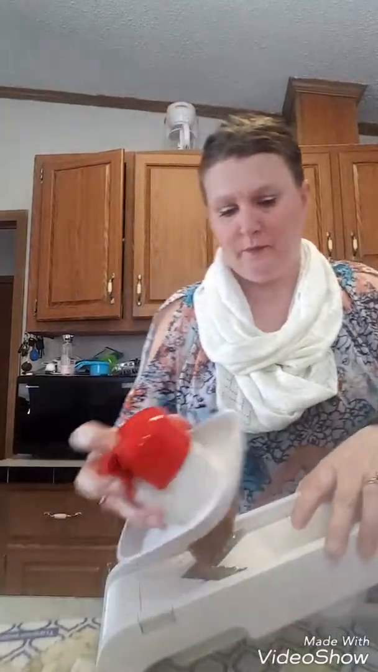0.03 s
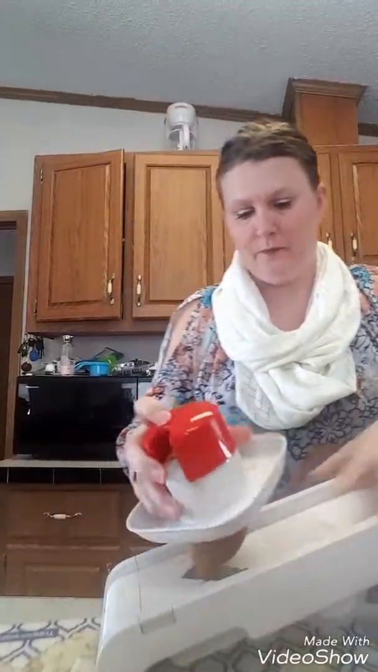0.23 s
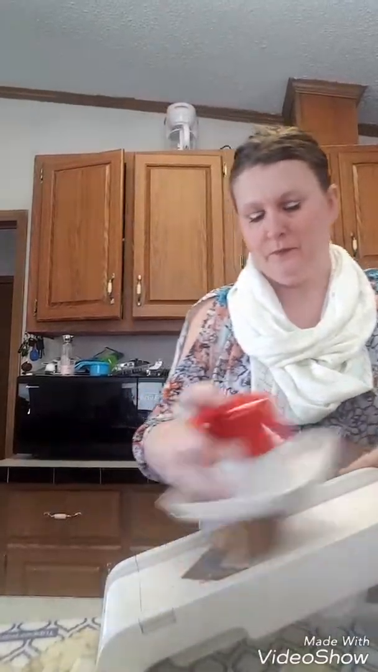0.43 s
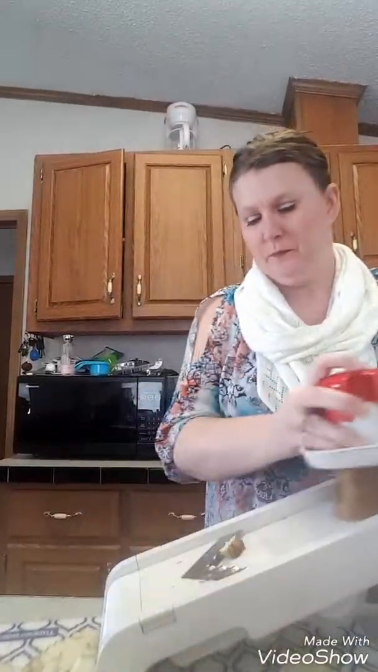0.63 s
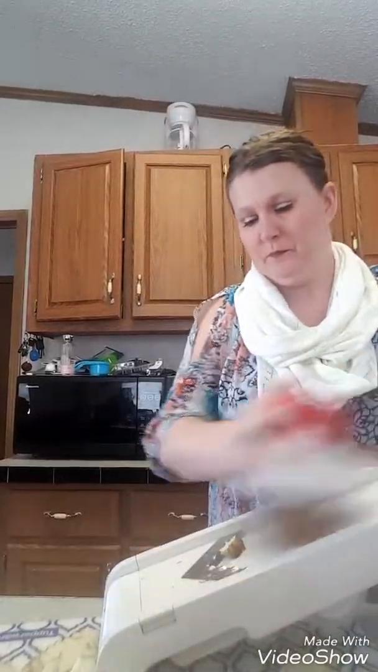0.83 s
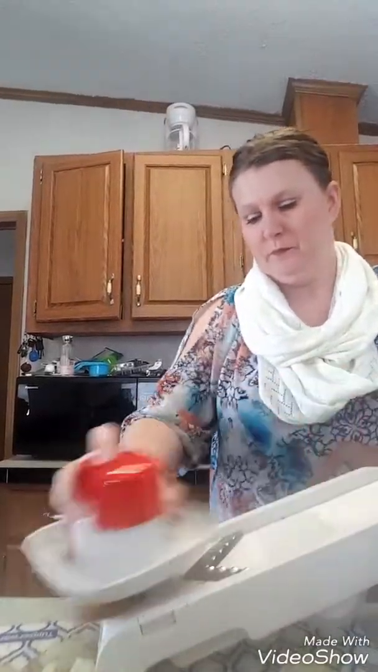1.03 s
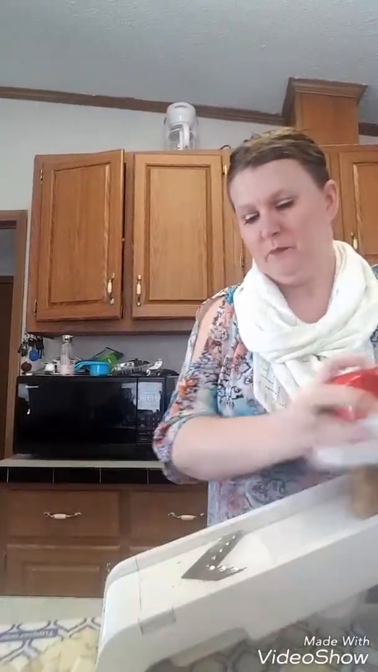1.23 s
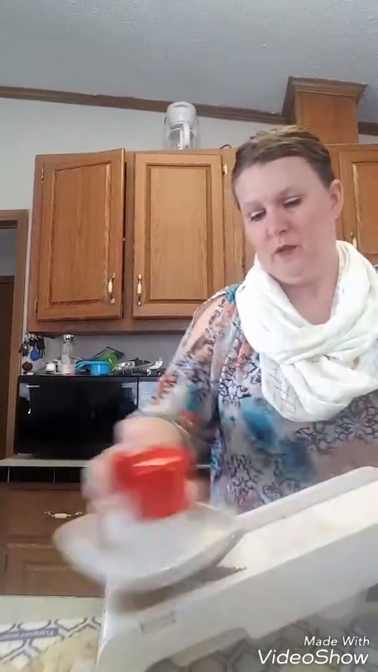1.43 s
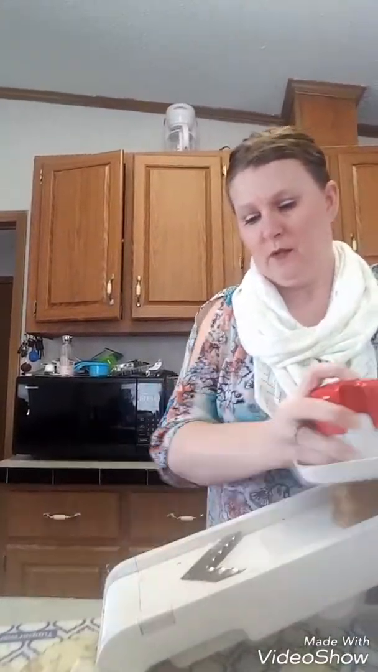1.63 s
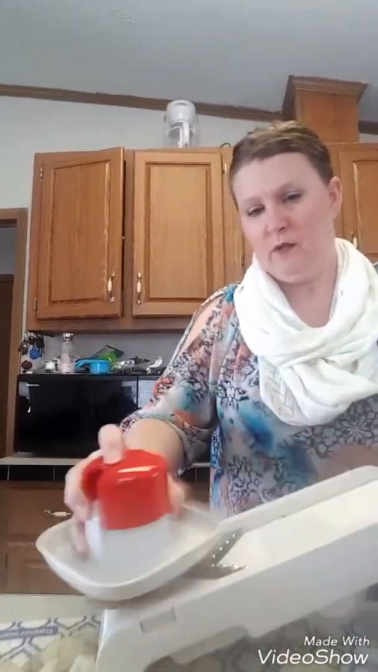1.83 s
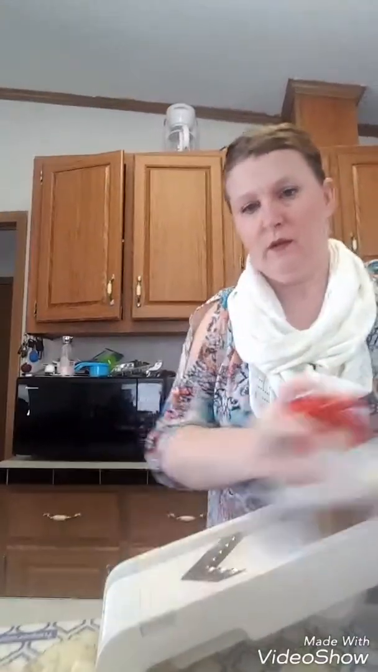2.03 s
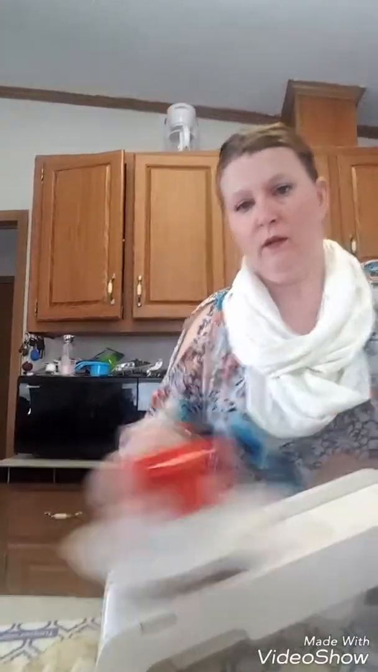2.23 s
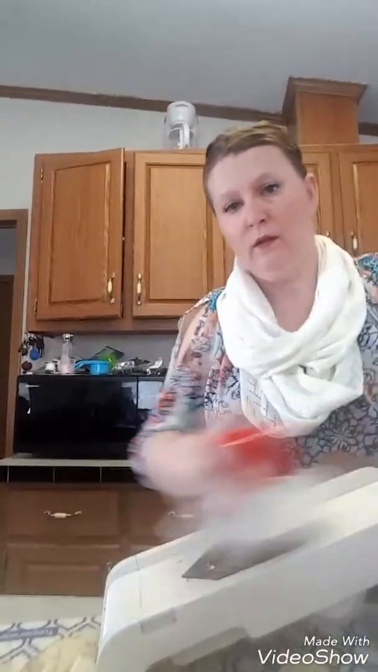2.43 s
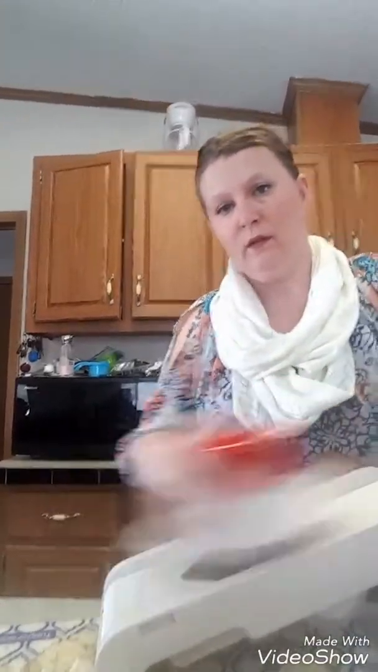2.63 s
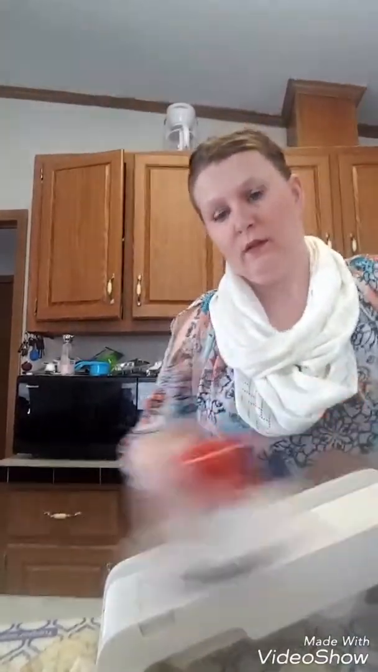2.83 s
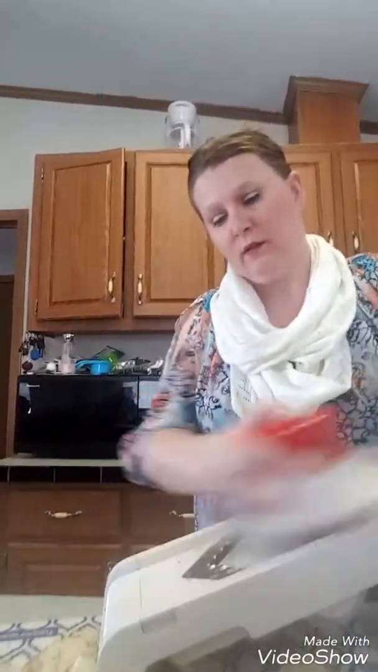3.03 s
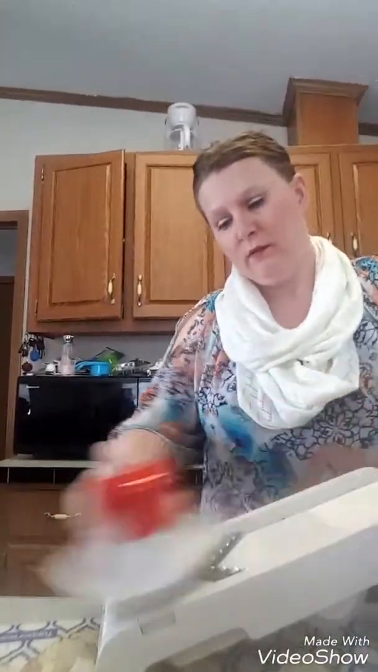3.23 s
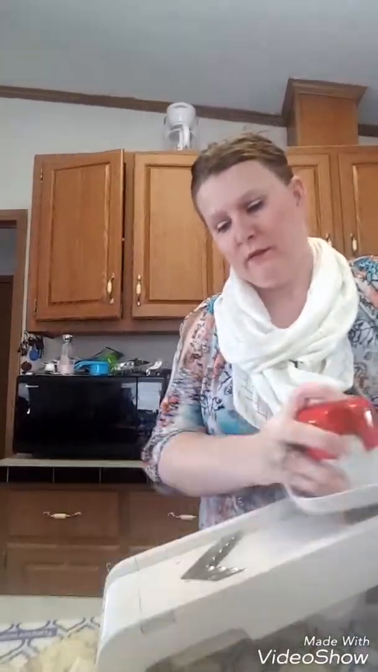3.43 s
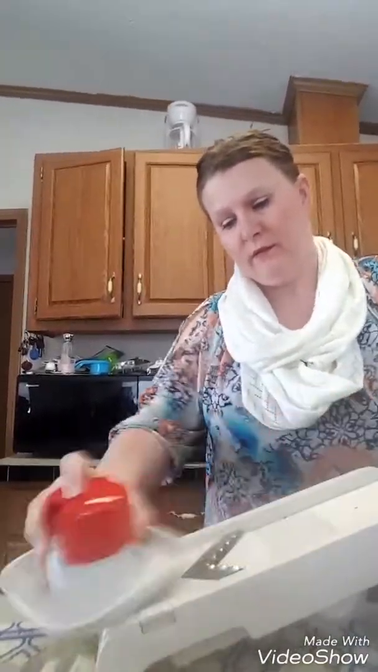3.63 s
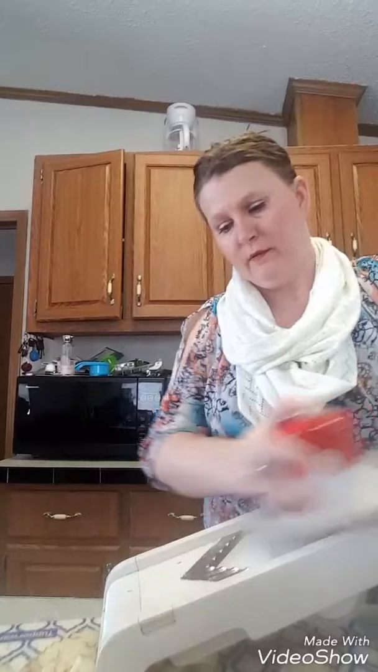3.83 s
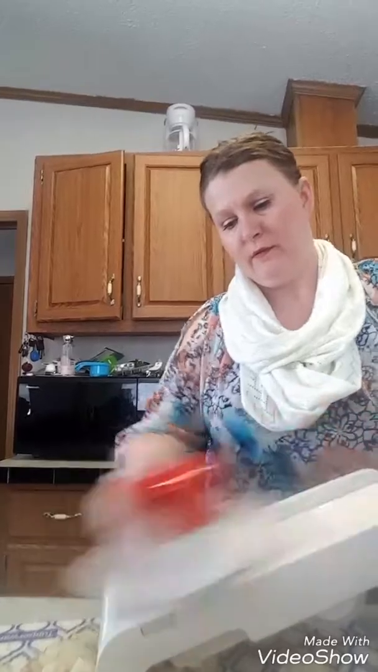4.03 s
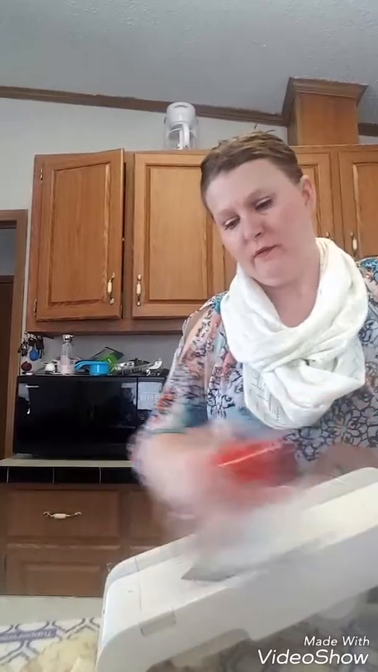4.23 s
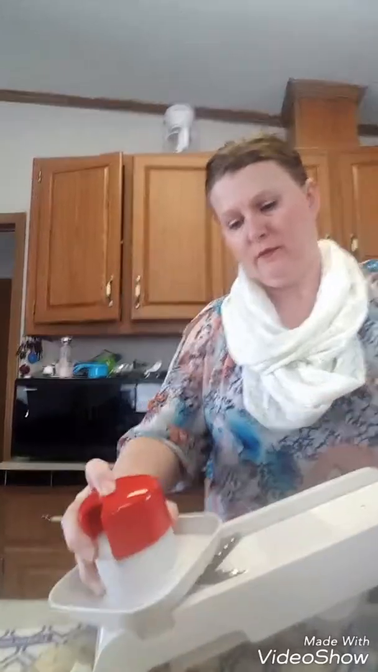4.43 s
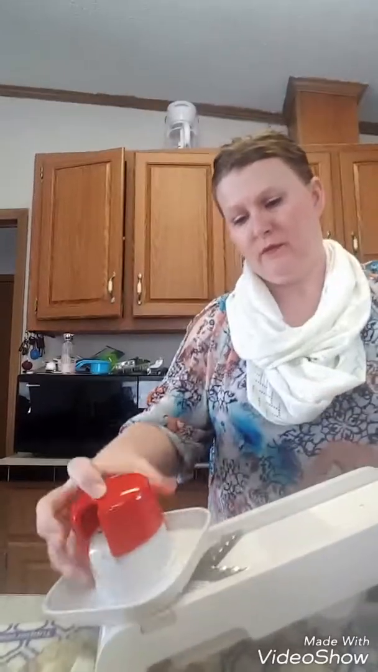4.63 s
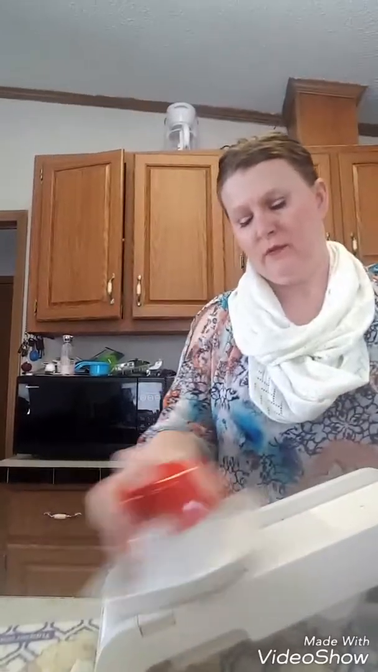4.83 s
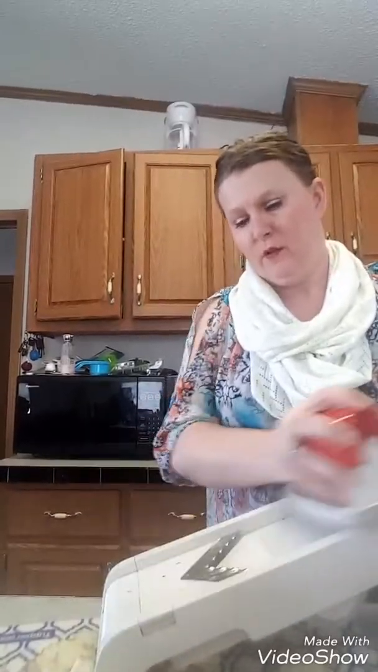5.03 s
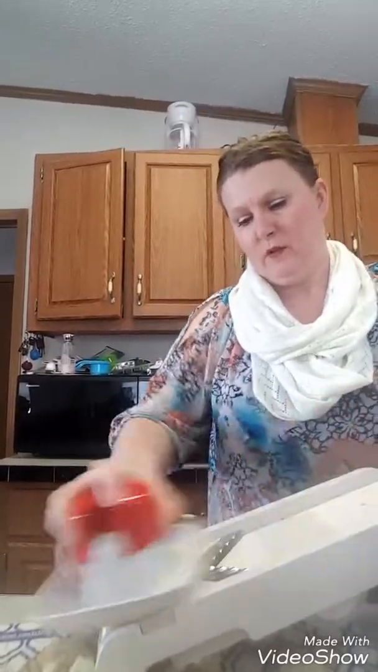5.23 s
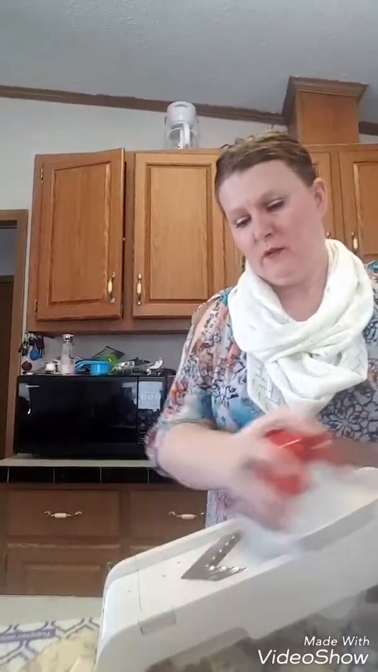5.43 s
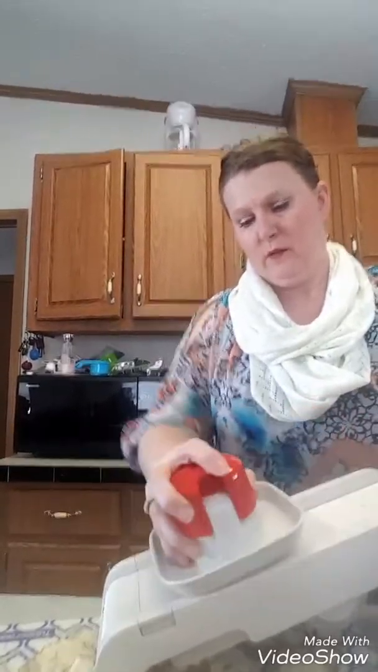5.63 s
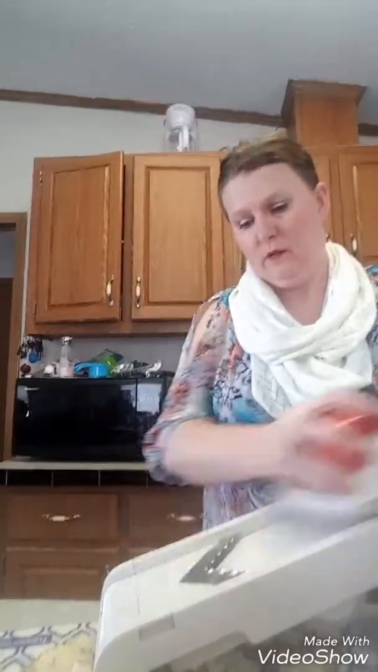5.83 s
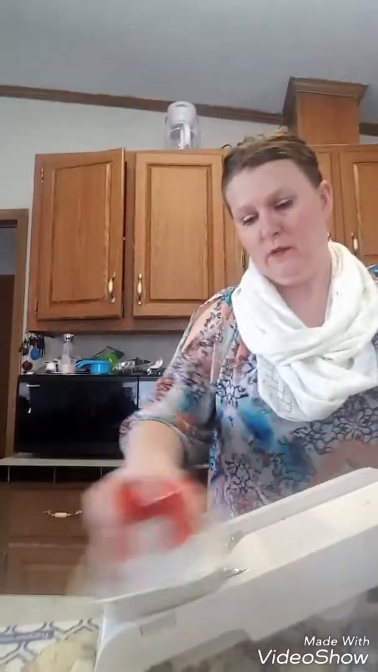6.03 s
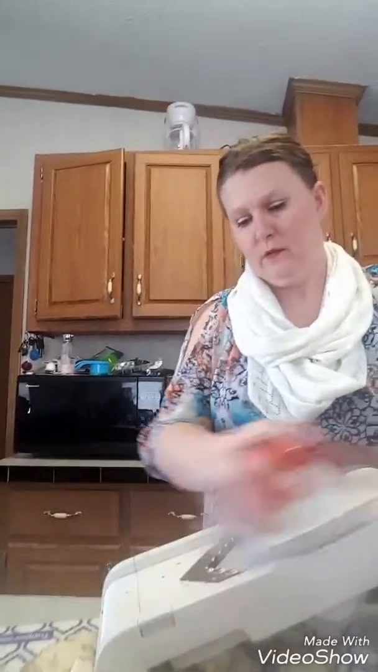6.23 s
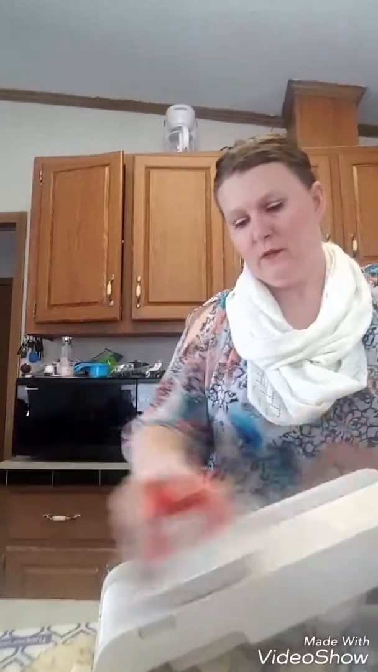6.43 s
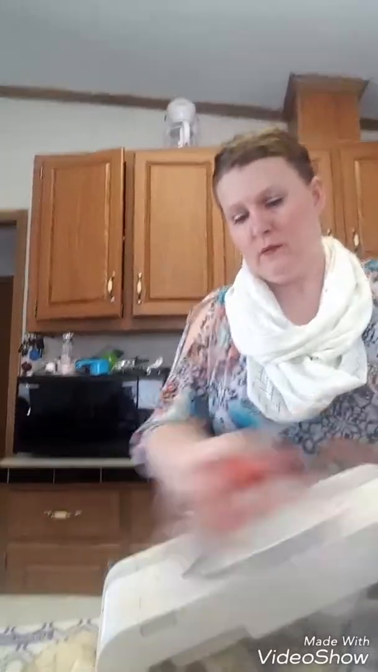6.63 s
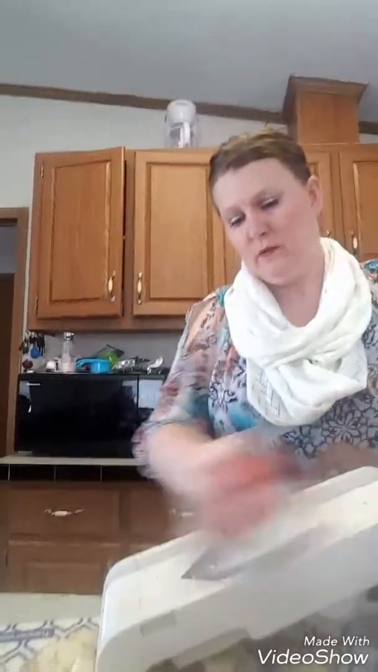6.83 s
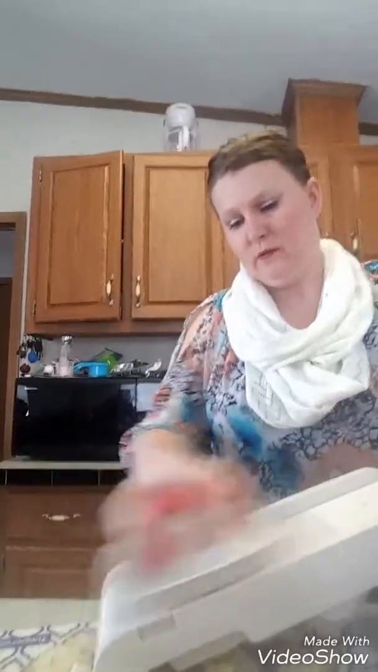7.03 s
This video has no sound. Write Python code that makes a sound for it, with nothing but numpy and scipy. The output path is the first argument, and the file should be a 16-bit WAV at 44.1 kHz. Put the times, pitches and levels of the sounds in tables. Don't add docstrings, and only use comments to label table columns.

```python
import sys
import numpy as np
from scipy import signal
from scipy.fft import rfft, irfft
from scipy.io import wavfile
from scipy.ndimage import uniform_filter1d

SR = 44100
rng = np.random.default_rng(int(sys.argv[2]) if len(sys.argv) > 2 else 0)


def inscribe(sig):
    pcm = np.round(np.clip(np.atleast_2d(sig).T, -1, 1) * 32767)
    wavfile.write(sys.argv[1], SR, pcm.astype(np.int16))


def makeup_ratio(level_db):
    decades = np.asarray(level_db, float) / 20
    return 10 ** decades


N = 313110

# start in seconds, hand pressure in dB,
# guard wobble in dB, skin speed in dB, hold in seconds.
PUSHES = [(0.0, -30.5, -31.5, -38, 0.0025), (0.525, -34, -39, -35.5, 0.0064), (0.993, -20, -31, -31, 0.017),
          (1.488, -18.5, -27, -18.5, 0.0064), (1.866, -22, -20, -47, 0.0042),
          (2.218, -31, -32, -23.5, 0.015), (2.574, -29, -32, -25, 0.011),
          (2.93, -24.5, -26.5, -28.5, 0.055), (3.308, -28.5, -21.5, -19, 0.0062),
          (3.65, -23, -22.5, -41, 0.03), (3.992, -26.5, -30, -34, 0.055), (4.333, -29, -27, -52, 0.0026),
          (4.371, -46.5, -32, -10, 0.0042), (4.87, -48, -62, -46.5, 0.0066),
          (5.215, -18.5, -27.5, -34, 0.073), (5.78, -38, -68, -35, 0.0034),
          (6.11, -20.5, -23.5, -19, 0.025), (6.335, -22.5, -14.5, -29, 0.025),
          (6.528, -22, -22, -17, 0.019), (6.764, -27, -15, -18.5, 0.0027)]
# peak time in seconds, hand pressure in dB,
# guard wobble in dB, skin speed in dB.
DRAGS = [(0.29, -60, -67, -56.5), (0.396, -42.5, -49, -82), (0.64, -61, -66, -54), (0.75, -59, -64, -58),
         (0.972, -45, -58, -61), (1.236, -36.5, -46, -49), (1.266, -43, -58, -29),
         (1.292, -31.5, -33.5, -35.5), (1.692, -27, -34, -29.5), (2.047, -26.5, -32, -28),
         (2.391, -26.5, -26.5, -28), (2.774, -25, -44, -31), (3.134, -32, -33, -31.5),
         (3.481, -28, -31.5, -30), (3.854, -27.5, -50, -30.5), (4.211, -17.5, -26.5, -26),
         (4.539, -37.5, -72, -63), (4.722, -46, -74, -56.5), (5.031, -15.5, -22, -24.5),
         (5.37, -25, -42, -26), (5.475, -40, -12, -25), (5.642, -28, -29.5, -24.5), (5.963, -41, -58, -55),
         (6.03, -71, -57, -55.5), (6.3, -30, -32.5, -32.5), (6.412, -52, -57, -41), (6.51, -38, -32, -31.5),
         (6.718, -30.5, -34, -32), (7.007, -22, -21.5, -19.5)]
# rise in dB per second, fall in dB per second.
PUSH_SLOPES = [
    (1500, 116),
    (2500, 220),
    (4000, 283),
    (4000, 311),
]
DRAG_SLOPES = [
    (217, 198),
    (220, 212),
    (196, 340),
    (200, 246),
]
PUSH_RUMBLE_DB, DRAG_RUMBLE_DB = -8.5, -0.5
# time in seconds, counter rumble in dB.
LEAN = [(0.0, 2.5), (0.1, -12), (0.6, 4), (1.0, -3.5), (2.0, -0.5), (2.8, 1.5), (3.5, 1.5), (4.0, -1.5),
        (4.9, -5), (5.5, -1.5), (6.2, -4), (7.1, -4)]

# frequency in Hz, bandwidth in Hz, peak gain in dB.
COUNTER = [(63, 9.6, -3), (110.3, 16, 0.5), (156.4, 18, 1), (246, 42, -3)]
# frequency in Hz, bandwidth in Hz, peak gain in dB.
FRAME = [(367.4, 62, 0), (494.4, 184, 3), (552.5, 132, 4), (694, 182, -2.5), (784, 71, 3.5),
         (848.6, 43, -2), (1056, 167, -4), (1160, 23, -2.5), (1290, 32, -5)]
# frequency in Hz, bandwidth in Hz, peak gain in dB.
GUARD = [(1839, 298, 10), (1930, 160, 13), (2095, 99, 3.5), (2464, 235, 4.5), (2780, 230, 4), (3186, 46, 1),
         (3450, 33, 1.5)]
# frequency in Hz, density in dB per Hz.
SKIN = [(1760, -7), (3000, -3), (4020, -9.5), (6180, -1.5), (7150, -15.5), (8690, -9.5), (11500, -23),
        (12000, -19), (12800, -9.5), (14500, -19), (15800, -50)]

# start in seconds, tearing level in dB, length in seconds, level at first bite
# in dB, brightness in dB per octave.
CUTS = [(0.989, -7.5, 0.05, -4.5, 2.5), (1.484, -1.5, 0.045, -20, 4.5), (1.868, -2, 0.035, -8, 3.5),
        (2.218, -5.5, 0.041, -4.5, 3.5), (2.368, -8, 0.047, -6, -0.3), (2.578, -1, 0.03, -6.5, 3.5),
        (2.9262, -4, 0.054, -38, 6.5), (3.112, -15.5, 0.044, -6, 0), (3.301, -4.5, 0.036, -6, 5.5),
        (3.661, -9.5, 0.04, 5, 6), (4.0153, -4, 0.036, -8.5, 3.5), (4.372, -6.5, 0.045, -6, -1),
        (4.98, -9, 0.058, -11, -8.5), (5.23, -7, 0.056, -8.5, 3), (5.447, -12.5, 0.061, 9, -1.5),
        (6.124, -14, 0.029, 8, 2), (6.525, -9, 0.05, -2, 2), (6.969, -10, 0.048, -11, 4)]
# frequency in Hz, density in dB per Hz.
TEAR = [(180, -61), (300, -3), (454, -0.5), (622, -10), (825, 9), (1330, -15), (1860, 0), (2310, -1),
        (5840, -1.5), (7250, -10.5), (8270, -5), (11200, -22), (14100, -12), (15800, -38)]

# start in seconds, tick level in dB,
# tick pitch in Hz, frame against the tick in dB.
DOWN_KNOCKS = [(0.5537, -17.5, 3100, -1.5), (0.9965, -7.5, 2720, -17.5), (1.4959, -7.5, 2780, -40),
               (1.8663, -7.5, 2280, -26), (1.9034, -8, 3320, -28), (2.2186, -9.5, 2850, -2.5),
               (2.573, -13, 2780, 3), (2.5938, -19, 3520, 0), (2.9291, -14.5, 2100, -26),
               (2.9545, -9, 1900, -10), (3.3046, -10.5, 2600, 4), (3.6631, -17, 1960, -20),
               (3.9905, -26, 1980, 16.5), (4.3318, -4.5, 1900, -3), (4.3713, 5, 4400, -12.5),
               (5.233, -7.5, 1750, -16), (5.3132, -5, 2900, -3.5), (5.3286, -19, 1500, 0),
               (5.358, -8, 2560, 1.5), (5.3671, -2.5, 3000, -13), (5.4391, 1, 2000, -11.5),
               (5.46, 4.5, 2420, -13), (6.114, -2.5, 2460, -27), (6.5256, -0.5, 4620, -17),
               (6.9809, -11, 2120, 0.5), (7.005, -6, 2170, -17)]
# start in seconds, tick level in dB,
# tick pitch in Hz, frame against the tick in dB.
BACK_KNOCKS = [(1.2072, -15.5, 2090, -8.5), (1.2665, -17, 2940, -5), (1.29, -9.5, 2780, -37),
               (1.699, -8, 2600, -3.5), (2.0575, -9, 2780, -6.5), (2.3555, -29, 1870, 9),
               (2.3731, -7.5, 3300, -8), (2.4138, -8.5, 2800, -2.5), (2.7215, -21.5, 3020, -2),
               (2.7778, -11.5, 2930, -3), (3.1471, -9, 1940, -4.5), (3.4464, -16, 2000, 0),
               (3.493, -13.5, 1930, -1), (3.8107, -17.5, 2080, 3), (3.8261, -7, 3660, -1.5),
               (3.8566, -3.5, 1940, 1.5), (4.1702, -15.5, 1990, -21), (4.2207, -12.5, 3620, -5),
               (4.984, -9.5, 2590, -5.5), (5.017, -6.5, 2420, -12), (5.0412, -12.5, 1740, -6),
               (5.6328, -11, 1820, -13), (6.3351, 0, 1880, -5.5), (6.361, -19, 2070, -14),
               (6.3935, -2, 1960, -13), (6.472, -8.5, 2130, -6), (6.7462, -5, 1680, -4.5),
               (6.764, -3, 2660, -6)]
# start in seconds, tick level in dB,
# tick pitch in Hz, frame against the tick in dB.
TOUCHES = [(0.157, -34.5, 1700, 1), (0.5244, -21, 3740, -8), (0.974, -30, 1800, 8),
           (1.4675, -28.5, 1930, -12), (1.6339, -24, 4370, 7), (1.9582, -19.5, 1720, -2.5),
           (1.9973, -27.5, 3080, 9), (2.8566, -27.5, 1750, 3), (2.8689, -26, 1740, -25),
           (3.0884, -27.5, 1700, 8), (3.4076, -21, 1760, -5), (3.6456, -34, 2070, -5),
           (4.6533, -28.5, 1620, -0.5), (4.871, -34, 890, 6.5), (4.9157, -25.5, 1860, 7.5),
           (4.9387, -21.5, 1880, 0), (4.9568, -18, 1740, -4), (5.1856, -30, 3120, 0),
           (5.2073, -33, 1960, 10), (5.5867, -30, 2100, 10.5), (5.7821, -19, 4930, -27),
           (6.0667, -28.5, 1930, 0.5), (6.0937, -25, 1720, 9.5), (6.222, -16, 1930, -4),
           (6.2711, -22, 2220, 3), (6.6286, -22.5, 1720, 1), (6.6707, -23.5, 2210, 7.5)]
# start in
# seconds, tick level in dB, # tick pitch in Hz, frame against the tick in dB.
MORE_KNOCKS = [(1.17, -46, 1820, 16), (1.228, -31, 3500, -12), (1.2448, -23.5, 2960, 7),
               (1.4184, -39, 1940, -13), (1.484, -27, 2000, -5), (2.208, -20.5, 2400, -6),
               (2.3303, -41, 1690, -14), (2.3802, -8.5, 3450, -10), (3.0756, -35, 1930, -8),
               (3.1055, -22.5, 1890, 9.5), (3.1255, -23.5, 1900, 8), (3.4777, -18.5, 2780, 6),
               (4.0205, -25, 1790, -7.5), (4.1297, -46, 2080, -6), (4.1502, -25, 1900, -1),
               (4.572, -52, 1100, -2), (4.794, -59, 1250, 9), (4.9635, -21, 3450, -2), (5.1925, -25, 3100, 5.5),
               (5.452, -10, 1890, -7), (5.478, -4, 2390, -14), (5.925, -48, 2200, -3), (6.016, -49, 3500, -5),
               (6.1045, -29, 2690, -15), (6.467, -16, 2110, -11), (6.78, -21, 2760, -9),
               (7.084, -24, 1850, -14)]
# start in seconds, tick level in dB, tick pitch in Hz,
# frame against the tick in dB.
TAPS = [(0.066, -28.5, 3040, -1), (0.271, -36.5, 5000, -12), (0.406, -49, 1840, 8),
        (0.6651, -36.5, 2160, 3), (0.187, -47, 4300, -22), (0.514, -30, 3500, -7), (0.543, -34, 6000, -22),
        (0.95, -43, 3500, 7), (1.715, -18, 5500, -24), (3.795, -34, 1100, 7), (3.873, -15, 4960, -17),
        (4.237, -21, 4500, -19), (4.725, -33.5, 5500, -21), (4.883, -30, 4970, -12),
        (5.058, -16, 4270, -22), (4.722, -43, 1710, 16), (5.9565, -36.5, 3000, 6), (5.799, -39, 5500, -16),
        (5.878, -46, 5530, 17.5), (5.894, -45, 6000, -8), (3.819, -15, 1900, -4), (6.293, -22, 5040, -10)]
DOWN_RATTLE_DB, BACK_RATTLE_DB, TOUCH_RATTLE_DB, TAP_RATTLE_DB = -9, -14.5, -9.5, -12.5
RATTLE_WITH_FRAME = 0.65

# start in seconds,
# peak level in dB, pitch in Hz.
SLAPS = [(0.0, -17.5, 184), (2.774, -26, 103), (3.16, -22, 96), (3.478, -12.5, 458), (3.492, -20, 103.6),
         (3.601, -24.5, 870), (3.991, -5, 516), (5.018, -0.5, 807), (5.279, -9, 421), (5.3287, -7.5, 493),
         (5.339, -9.5, 650), (6.113, -24, 730), (6.27, -16.5, 700), (6.329, -10, 770), (6.394, -4.5, 753),
         (6.528, -7.5, 743), (6.766, -7.5, 790), (6.915, -18, 785), (0.401, -31, 720), (1.866, -13.5, 510),
         (2.574, -14, 496), (5.312, -11, 514), (6.63, -14.5, 740), (6.671, -19, 760), (1.163, -33, 483)]
# start in seconds, peak level in dB, pitch in Hz.
THUMPS = [(0.533, -31, 155), (0.64, -36.5, 113), (1.228, -36, 154), (1.303, -23.5, 105.6),
          (1.655, -19.5, 362), (2.007, -26, 153), (2.386, -13.5, 378), (2.442, -33, 90), (2.049, -27, 306),
          (2.6, -29.5, 342), (3.15, -16, 640), (4.38, -16, 875), (0.285, -41, 173), (2.741, -25, 200),
          (3.112, -18.5, 374), (3.136, -18, 246), (3.824, -25, 380), (4.19, -19, 264), (4.221, -12.5, 492),
          (4.206, -12, 520), (4.243, -20, 430), (4.532, -42, 292), (5.462, -26.5, 86), (6.385, -23, 109),
          (6.756, -25, 222), (7.002, -28, 153)]
# start in seconds, peak level in dB, pitch in Hz.
PINGS = [(0.157, -45, 1720), (1.207, -30, 2000), (2.721, -28, 1800), (2.857, -33, 1950),
         (2.868, -22.5, 1840), (2.887, -43, 1850), (2.929, -21, 1930), (3.087, -27, 1850),
         (4.034, -21, 1810), (4.333, -11, 2185), (4.373, -9, 5020), (4.654, -36, 1760), (4.722, -41, 1204),
         (4.871, -32.5, 886), (5.467, -5, 2490), (5.782, -19, 5090), (6.114, -5.5, 4590),
         (6.222, -21.5, 2020), (6.629, -24, 1820), (6.765, -6.5, 2410)]
SLAP_RING_CYCLES, THUMP_RING_CYCLES, PING_RING_CYCLES = 17, 22, 48

# frequency in Hz, time to decay 60 dB in seconds.
KITCHEN = [(100, 0.47), (500, 0.25), (2000, 0.38), (6000, 0.25), (14000, 0.18)]
# frequency in Hz, density in dB per Hz.
HUSH = [(15, -35), (25, -18), (49, 0), (297, -5), (368, -2), (552, -8.5), (1660, -18), (6210, -23.5),
        (7300, -27), (11500, -39), (12800, -33), (14300, -34), (15300, -60)]
HUSH_DB = -49.5
# time in seconds, hush level in dB.
STIR = [(0.0, 14), (0.13, -1), (0.23, -0.5), (0.29, 1), (0.35, -5), (0.42, 1), (0.5, 2), (0.7, 1),
        (0.86, -3.5), (0.95, 4), (4.55, 9.5), (4.63, 2), (4.73, -1), (4.8, -6), (4.86, 0.5), (5.7, 4),
        (5.9, 1), (6.05, 4.5)]
# frequency in Hz, side against mid in dB.
SIDE_SPECTRUM = [(50, -24), (200, -26), (3000, -26), (6000, -20), (10000, -9), (15000, -12)]
# lowest frequency in Hz, share of blocks present.
SIDE_BLOCKS = [(0, .35), (4200, .6), (8200, .9)]

# end in seconds, length in seconds, #
# lowest frequency in Hz.
STARVED = [(1.2, .005, 8900), (1.49, 0.0054, 5000), (1.859, .006, 4000), (2.211, 0.0094, 3500),
           (3.299, 0.008, 1500), (0.51, 0.0029, 5000), (3.645, 0.0039, 3500), (4.333, 0.0043, 6000),
           (4.373, 0.0066, 4000), (5.235, .006, 9100), (5.367, .015, 10000), (5.55, 0.054, 9900),
           (6.258, 0.044, 11000), (6.106, 0.0027, 8000), (6.522, 0.0028, 6000), (6.768, 0.0026, 7000),
           (0.98, 0.014, 10000), (4.31, 0.06, 9800), (4.353, 0.005, 9000), (5.093, 0.041, 10000),
           (6.387, 0.006, 10000)]
GAP_HZ, GAP_DB = 9400, -76
EDGE_HZ = 15950


def slide():
    pushes = strokes(PUSHES, PUSH_SLOPES, PUSH_RUMBLE_DB)
    drags = strokes([(*row, 0) for row in DRAGS], DRAG_SLOPES, DRAG_RUMBLE_DB)
    rumble, drum, rattle, hiss = pushes + drags
    bumps, grit = slips(N, 220, 4.2, 0.84), slips(N, 900, 7.2, 1.0)
    judder = makeup_ratio(1.57 * evened(uniform_filter1d(rng.standard_normal(N), 400)))
    out = rumble * chatter(bumps, COUNTER, patchy_db=0.0, hold=12)
    out += drum * chatter(bumps * judder, FRAME, patchy_db=2.5, hold=17)
    out += rattle * chatter((bumps + 0.51 * grit) * judder, GUARD, patchy_db=4.0, hold=8.3)
    return out + hiss * mottled(colour(grit * judder, SKIN), patchy_db=3.0)


def strokes(rows, slopes, rumble_db):
    t = np.arange(0, N + 32, 32) / SR
    s, press_db, wobble_db, speed_db, hold = np.transpose(rows)[:, :, None]
    early = np.maximum(s - t, 0)
    late = np.maximum(t - s - abs(hold), 0)
    counter_db = press_db + rumble_db + np.interp(s, *np.transpose(LEAN))
    envelopes = []
    for db, (rise, fall) in zip([counter_db, press_db, wobble_db, speed_db], slopes):
        level = makeup_ratio(db - rise * early - fall * late).sum(0)
        envelopes.append(np.interp(np.arange(N) / SR, t, level))
    return np.array(envelopes)


def slips(n, per_s, spread_db, smooth):
    u, e, g = rng.random(n), rng.exponential(1, n), rng.standard_normal(n)
    size = makeup_ratio(spread_db * np.minimum(e, 2))
    jolts = evened(np.sign(g) * size * (u < per_s / SR))
    return jolts + smooth * g


def chatter(x, modes, patchy_db, hold):
    luck = rng.standard_normal((len(modes), N // 64 + 1))
    share = makeup_ratio(patchy_db * uniform_filter1d(luck, int(hold), axis=1) * np.sqrt(int(hold)))
    out = np.zeros(N)
    for k, mode in enumerate(modes):
        drive = x * np.repeat(share[k], 64)[:N]
        out += (-1) ** k * ring(drive, [mode])
    return evened(out)


def dip():
    strikes = np.zeros(N)
    strikes[(np.array(knocks())[:, 0] * SR).astype(int)] = 1
    ramp = np.linspace(0, 1, 500)
    nearing = signal.oaconvolve(strikes, ramp)[len(ramp) - 1:]
    return makeup_ratio(-8 * np.minimum(nearing, 1))


def cut(db, length, bite_db, tilt_db):
    t = np.arange(6000) / SR
    bursts = colour(slips(len(t), 5000, 3.7, 0.75), TEAR, tilt_db)
    crackle = mottled(bursts, patchy_db=3.0)
    surge = makeup_ratio(2.15 * evened(uniform_filter1d(rng.standard_normal(len(t)), 110)))
    shape_db = np.interp(t, [0, 0.73 * length, length, length + 0.042], [bite_db, 0, -3, -30])
    return makeup_ratio(db - 10.5 + shape_db) * surge * crackle * np.minimum(t / 0.0025, 1)


def knocks():
    kinds = [(DOWN_KNOCKS, DOWN_RATTLE_DB), (BACK_KNOCKS, BACK_RATTLE_DB),
             (TOUCHES, TOUCH_RATTLE_DB), (MORE_KNOCKS, TOUCH_RATTLE_DB)]
    strikes = []
    for rows, db in kinds:
        strikes += [(*row, db + RATTLE_WITH_FRAME * (row[-1] + 8)) for row in rows]
    return sorted(strikes)


def knock(db, hz, frame_db, rattle_db):
    t = np.arange(5000) / SR
    g = rng.standard_normal(len(t))
    blow = np.sign(g) * np.exp(-(t / 0.0024) ** 2)
    blow += g * makeup_ratio(rattle_db - 2) * np.exp(-t / 0.017)
    spot = ring(blow, [(hz, 621 + 13.0 * db, 0.1),
                       (5300, 2500, -3.5 + 0.092 * db + 12.2 * np.log2(hz / 4000)),
                       (8400, 1800, -21.5 + 0.11 * db),
                       (13000, 1500, -31.0 + 0.12 * db)])
    guard = ring(blow, np.array(GUARD) * [rng.uniform(0.94, 1.093), 1.6, 1])
    tick = (spot + 0.5 * guard) / abs(spot).max()
    frame = ring(blow, FRAME + [(700, 1200, -13.0)])
    counter = ring(blow, COUNTER)
    body = frame / abs(frame).max() + makeup_ratio(-12.5) * counter / abs(counter).max()
    return makeup_ratio(db) * (tick + makeup_ratio(frame_db) * body)


def slap(db, hz, cycles):
    t = np.arange(12000) / SR
    phase = 2 * np.pi * hz * t
    modes = np.sin(phase) + 0.18 * np.sin(0.568 * phase) + 0.17 * np.sin(2.4 * phase)
    return makeup_ratio(db + 3 - 60 * t * hz / cycles) * modes * np.minimum(t / 0.0011, 1)


def ping(db, hz):
    t = np.arange(4000) / SR
    phase = 2 * np.pi * hz * t
    modes = np.sin(phase) + 0.5 * np.sin(1.2 * phase)
    return makeup_ratio(db + 8.5 - 60 * t * hz / PING_RING_CYCLES) * modes * np.minimum(t / 0.0013, 1)


def ring(x, modes):
    out = np.zeros(len(x))
    for k, (hz, width_hz, db) in enumerate(modes):
        r = np.exp(-np.pi * width_hz / SR)
        poles = [1, -2 * r * np.cos(2 * np.pi * hz / SR), r * r]
        out += (-1) ** k * makeup_ratio(db) * (1 - r * r) * signal.lfilter([.5, 0, -.5], poles, x)
    return out


def mottled(x, patchy_db):
    z = signal.stft(x, nperseg=256)[2]
    patches = uniform_filter1d(rng.standard_normal(z.shape), size=4, axis=0)
    patches = evened(uniform_filter1d(patches, size=4))
    return evened(signal.istft(z * makeup_ratio(patchy_db * patches), nperseg=256)[1][:len(x)])


def colour(x, points, tilt_db=0):
    hz = np.fft.rfftfreq(len(x), 1 / SR)
    gain_db = read(points, hz) + tilt_db * np.log2((hz + 200) / 5000)
    return irfft(rfft(x) * makeup_ratio(gain_db), len(x))


def read(points, hz):
    f, value = np.transpose(points)
    return np.interp(np.log(hz + 1), np.log(f + 1), value)


def evened(x):
    return x / np.sqrt(np.mean(x ** 2) + 1e-20)


def add(mix, s, sound):
    part = mix[round(s * SR):][:len(sound)]
    part += sound[:len(part)]


def kitchen(x):
    taps = np.zeros(SR // 2)
    at = np.arange(150, len(taps) - 20, 20)
    taps[at + rng.integers(0, 20, len(at))] = rng.choice([-1., 1.], len(at))
    hz, t, z = signal.stft(taps, SR, nperseg=256)
    decay = makeup_ratio(-60 * t / read(KITCHEN, hz)[:, None])
    tail = signal.istft(z * decay, SR, nperseg=256)[1]
    return signal.fftconvolve(x, tail / np.linalg.norm(tail))[:N]


def house_hush():
    hush = makeup_ratio(HUSH_DB) * mottled(colour(rng.standard_normal(N), HUSH), patchy_db=2.0)
    return hush * makeup_ratio(np.interp(np.arange(N) / SR, *np.transpose(STIR)))


def width(mid):
    hz, t, z = signal.stft(mid, SR, nperseg=1024)
    low_hz, share = np.transpose(SIDE_BLOCKS)
    blocks = len(t) // 3 + 1
    luck = rng.random((blocks, 1)) * .7 + rng.random((blocks, 3)) * .3
    luck = np.repeat(luck, 3, axis=0)[:len(t)]
    present = (luck < .15 + .7 * share) / np.sqrt(share)
    present = present.T[np.searchsorted(low_hz, hz, "right") - 1]
    phase = np.exp(2j * np.pi * rng.random(z.shape))
    side = signal.istft(z * present * phase, nperseg=1024)[1][:N]
    return colour(side, SIDE_SPECTRUM)


def scene():
    events = np.zeros(N)
    for s, *row in CUTS:
        add(events, s, cut(*row))
    for s, *row in knocks() + [(*tap, TAP_RATTLE_DB) for tap in TAPS]:
        add(events, s, knock(*row))
    for s, *row in SLAPS:
        add(events, s, slap(*row, SLAP_RING_CYCLES))
    for s, *row in PINGS:
        add(events, s, ping(*row))
    for s, *row in THUMPS:
        add(events, s, slap(*row, THUMP_RING_CYCLES))
    sliding = slide() * dip()
    room = kitchen(makeup_ratio(-11.0) * events + makeup_ratio(-18) * sliding)
    mid = events + sliding + room + house_hush()
    side = width(mid)
    return np.array([mid + side, mid - side])


def starved(x):
    hz, t, z = signal.stft(x, SR, nperseg=128, noverlap=96)
    gaps = np.zeros((len(hz), len(t)))
    for end, length, low_hz in STARVED:
        gaps += np.outer(hz > low_hz, (t > end - length) & (t < end))
    return signal.istft(z * makeup_ratio(-28. * gaps), SR, nperseg=128, noverlap=96)[1][:, :N]


def roll_off(x):
    return signal.sosfilt(signal.butter(12, 15950, fs=SR, output="sos"), x)


def record(dry):
    hz, t, z = signal.stft(np.tanh(dry / 1.787) * 1.074, SR, nperseg=2048, noverlap=1536)
    power = abs(z.mean(0)) ** 2
    band_db = 10 * np.log10(uniform_filter1d(power, size=16, axis=0) * 2 + 1e-20)
    loud_db = 10 * np.log10(power.sum(0) + 1e-20)
    luck = uniform_filter1d(rng.standard_normal(band_db.shape), size=18, axis=0)
    luck = uniform_filter1d(luck, size=6)
    safe_db = 19.0 * np.clip((GAP_HZ - hz) / 1000, 0, 9)[:, None]
    margin_db = band_db - GAP_DB - 1.0 * (loud_db + 29.5) + 40.0 * luck + safe_db
    band_limit = (hz < EDGE_HZ) * hz ** 2 / (hz ** 2 + 24.6 ** 2)
    keep = np.clip(margin_db / 4.3, .01, 1) * band_limit[:, None]
    holed = signal.istft(z * keep, SR, nperseg=2048, noverlap=1536)[1][:, :N]
    return roll_off(starved(holed))


dry = scene()
out = record(dry)
inscribe(out)
```